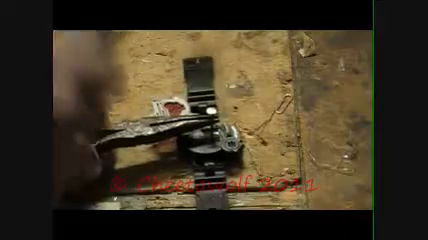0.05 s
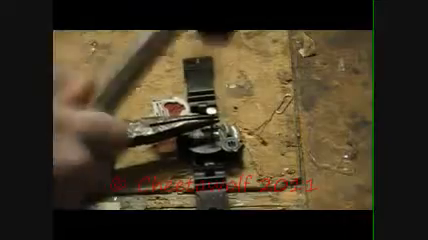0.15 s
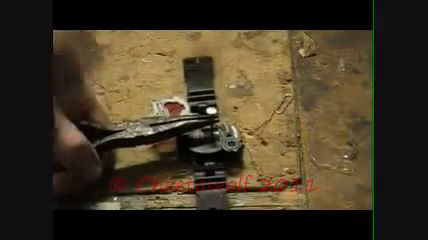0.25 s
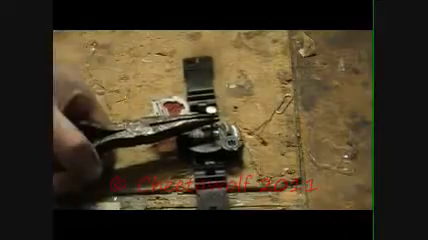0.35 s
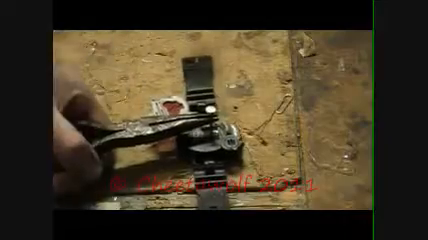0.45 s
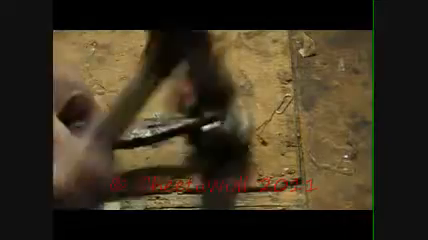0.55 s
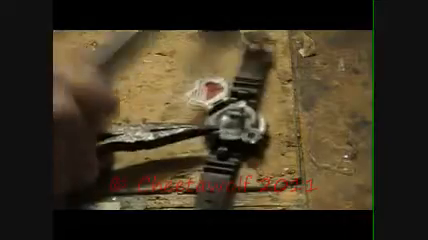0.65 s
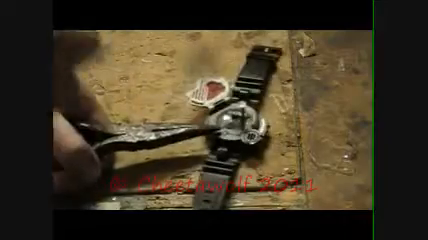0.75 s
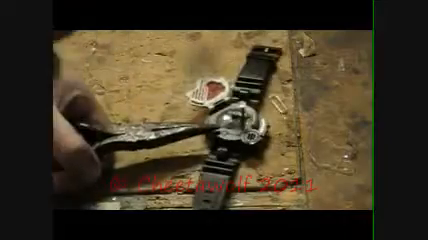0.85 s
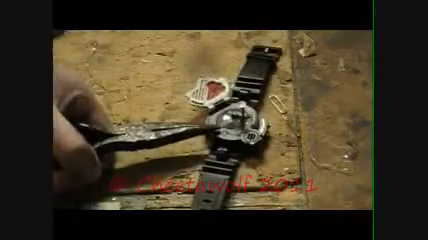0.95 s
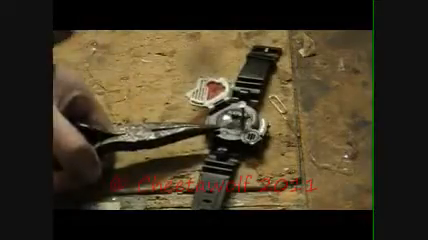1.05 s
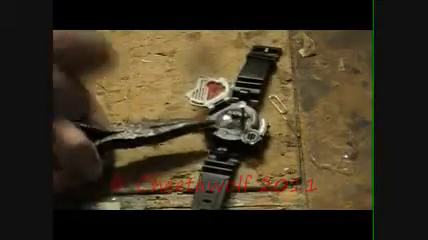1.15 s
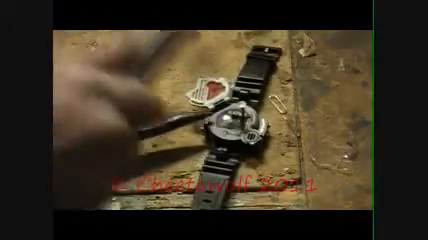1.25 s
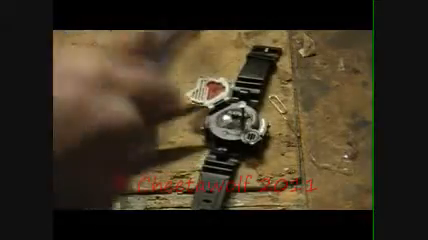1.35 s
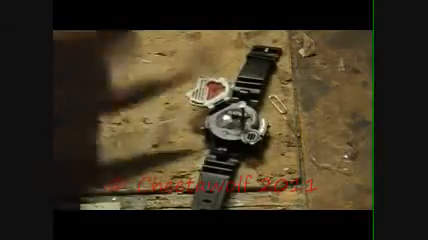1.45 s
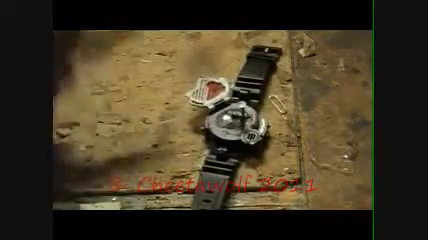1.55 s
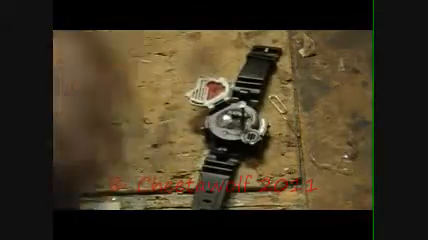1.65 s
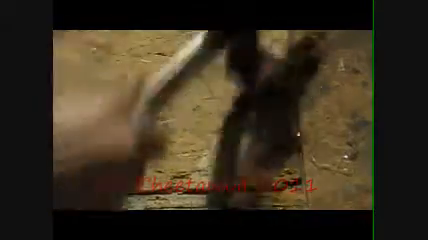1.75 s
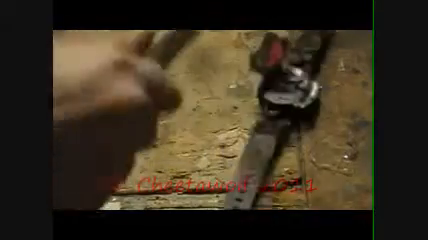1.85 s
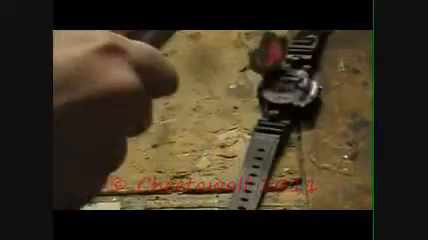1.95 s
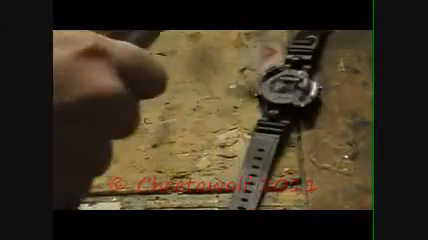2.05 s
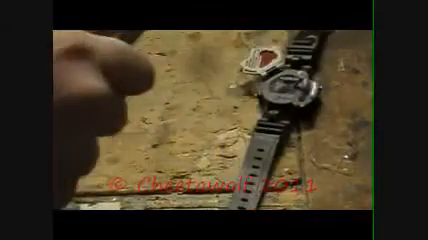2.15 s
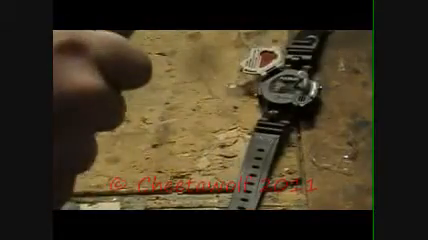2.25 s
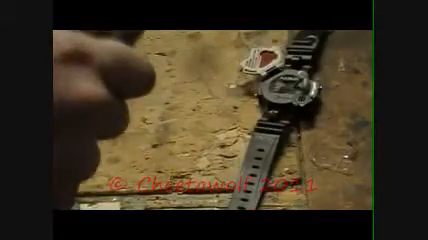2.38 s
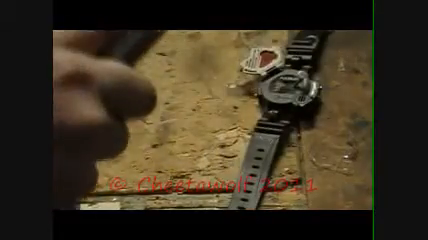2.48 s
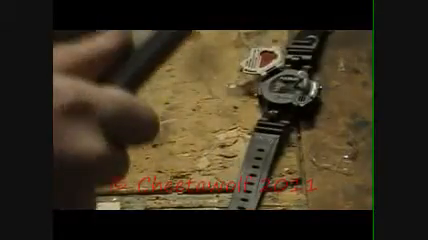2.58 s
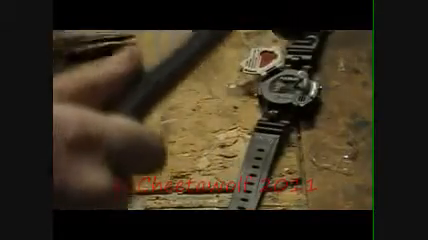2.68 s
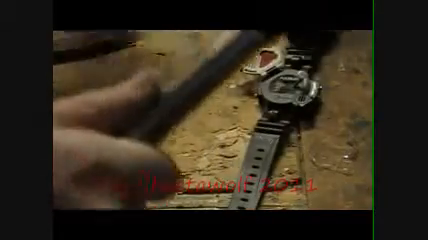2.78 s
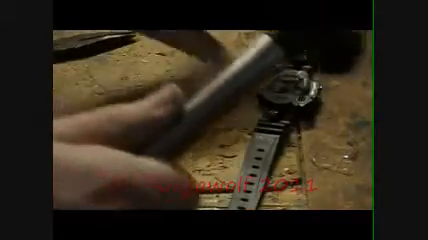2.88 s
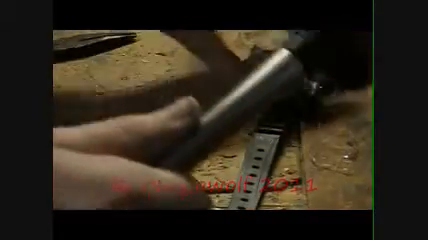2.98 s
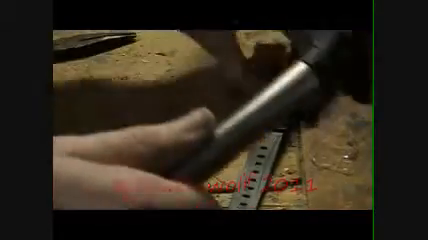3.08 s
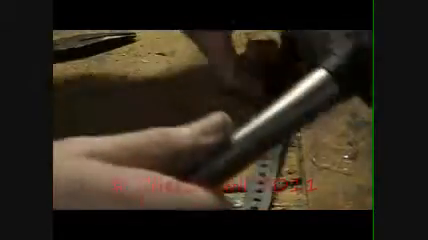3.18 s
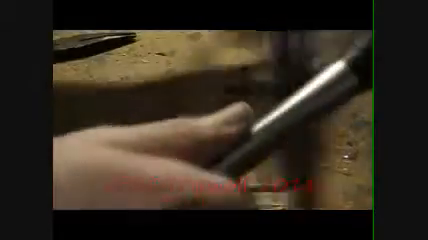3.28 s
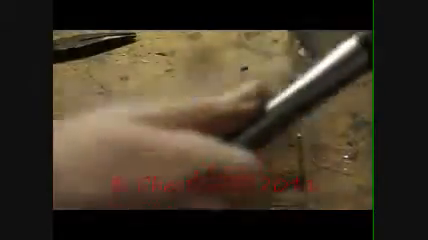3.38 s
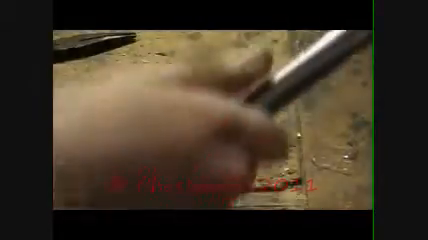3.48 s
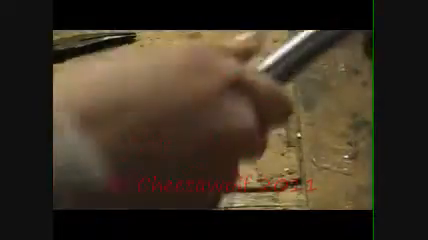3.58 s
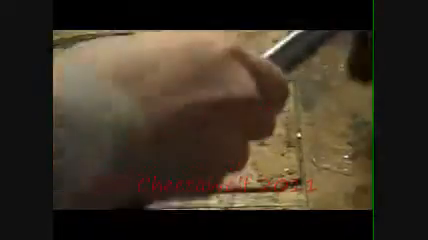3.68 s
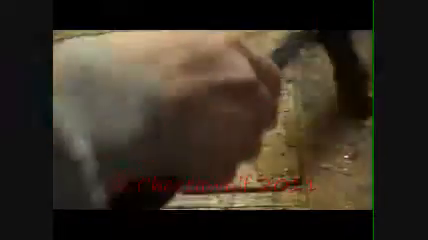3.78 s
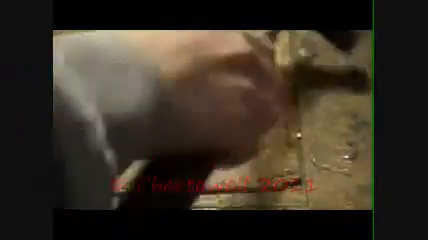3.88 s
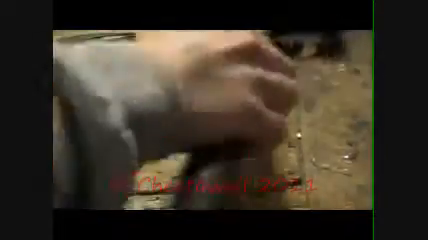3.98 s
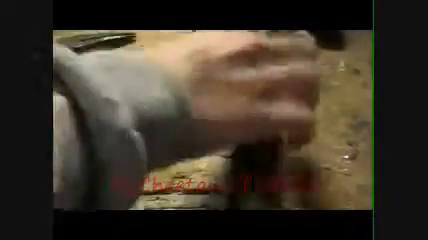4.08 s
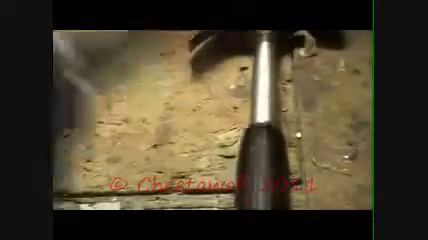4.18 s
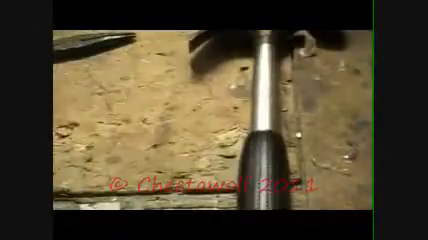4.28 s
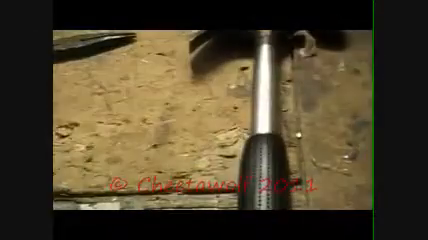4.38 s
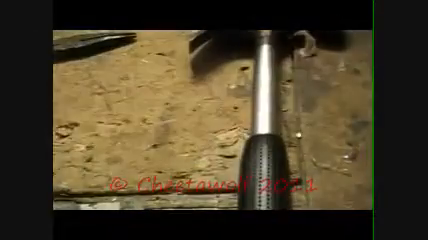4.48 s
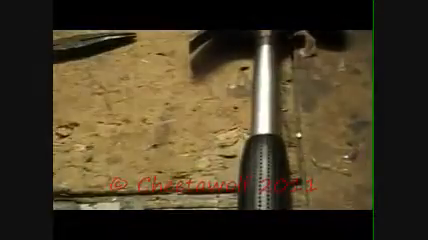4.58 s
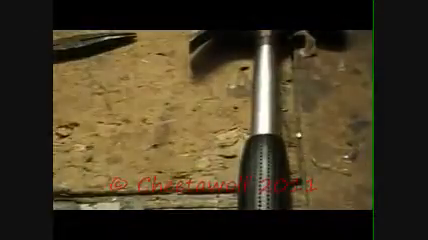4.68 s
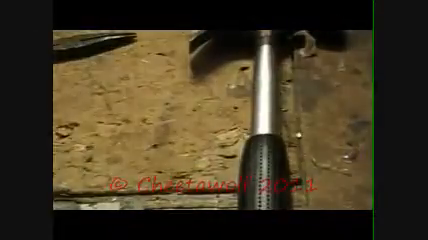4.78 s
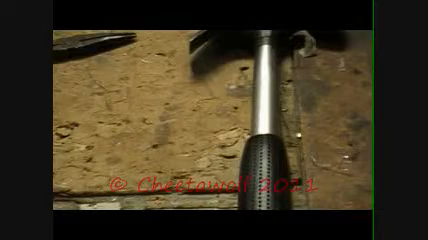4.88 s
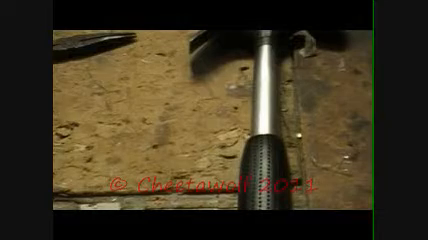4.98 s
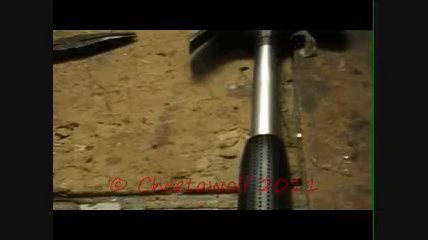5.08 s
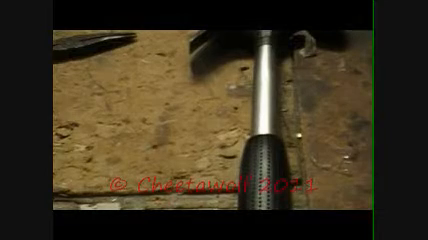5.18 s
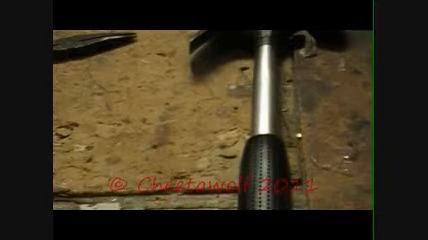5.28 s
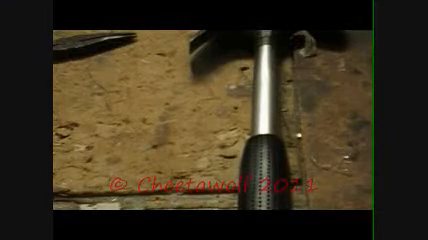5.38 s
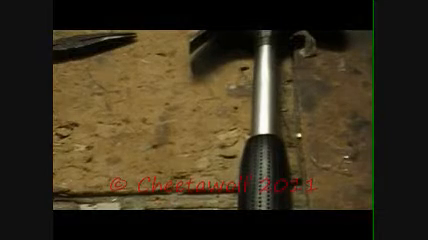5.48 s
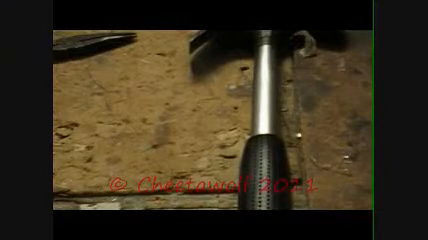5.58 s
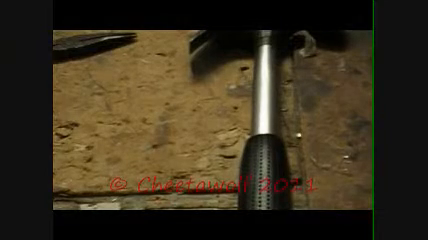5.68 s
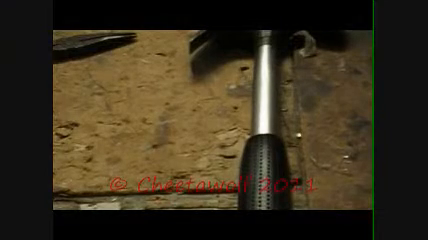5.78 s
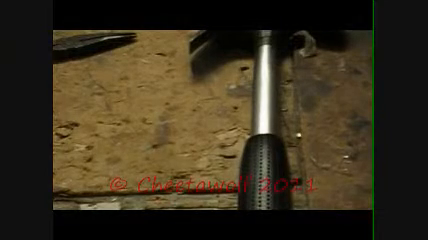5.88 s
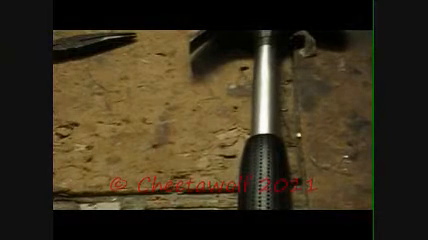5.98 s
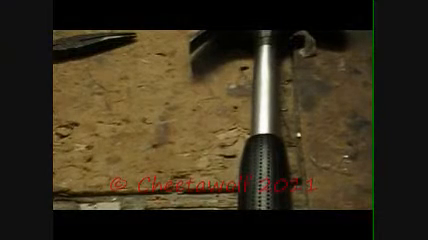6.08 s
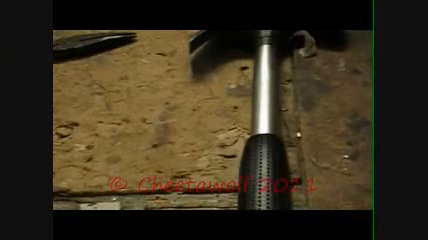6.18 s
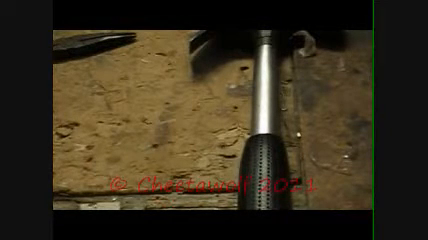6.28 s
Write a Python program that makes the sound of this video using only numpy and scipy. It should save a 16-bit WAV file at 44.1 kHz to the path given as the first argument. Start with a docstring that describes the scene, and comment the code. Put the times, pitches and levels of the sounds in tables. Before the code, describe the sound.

Close to the microphone in a small workshop, a hammer hits a nail set on a plastic piece, with a sharp crack, a tiny high ring and a rattle. A second hard blow follows about a second later, and the plastic bounces on a wooden board. Pliers and hammer are handled with light clicks and knocks, then the hammer lands in a cluster of wooden thuds. Faint hiss and room air remain.

```python
"""A small workshop, close to a camera. A hammer drives a nail into a plastic toy on a wooden board,
the toy jumps and rattles, and pliers and hammer are handled and dropped. Each impact radiates a
broadband click and excites the damped normal modes of board and toy; the steel nail rings briefly.
The walls add a short reverberation. Room air, a faint camera whine and microphone hiss lie beneath."""
import sys
import numpy as np
from scipy import signal
from scipy.fft import rfft, irfft, next_fast_len
from scipy.io import wavfile
from scipy.ndimage import uniform_filter1d

SR = 44100
rng = np.random.default_rng(int(sys.argv[2]) if len(sys.argv) > 2 else 0)


def inscribe(sig):
    """Save sig as 16-bit PCM at rate SR to the path in sys.argv[1].

    A 1-D sig is mono; a 2-D sig holds one channel per row.
    Samples are clipped to [-1, 1] before scaling.
    """
    pcm = np.round(np.clip(np.atleast_2d(sig).T, -1, 1) * 32767)
    wavfile.write(sys.argv[1], SR, pcm.astype(np.int16))


N = 279925

# Hard contacts: t/s, click level/dB, board level/dB, plastic level/dB, chatter T60/s, click dullness/1
IMPACTS = [(0.5304, -26, -44, -36.5, 0.039, 0.2), (0.652, 1.5, -19, -7.5, 0.069, 0.4),
           (0.778, -15.5, -27.5, -25.5, 0.036, 0), (0.8309, -43, -33, -32, 0.027, 0.8),
           (0.8687, -18, -53, -36, 0.035, 0.26), (0.919, -36, -45, -37, 0.023, 0.35),
           (1.8123, 6, -13, -13.5, 0.081, 0.47), (1.8203, -13, -24, -23, 0.018, 0.7),
           (1.9754, -2.5, -31, -25, 0.049, 0.7), (2.0136, -17.5, -25.5, -48, 0.12, 0.7),
           (2.7278, -32.5, -36, -33.5, 0.44, 0.6), (2.7549, -23, -16.5, -10.5, 0.054, 0.6),
           (2.7573, -9.5, -56, -37, 0.05, 0.06), (2.825, -13, -29, -10, 0.032, 0.14),
           (2.8543, -37, -17, -48, 0.057, 0.5), (2.9096, -40, -23, -26.5, 0.036, 0.5),
           (2.953, -39, -25, -38, 0.06, 0.6), (2.957, -24.5, -44, -37, 0.043, 0.54),
           (2.988, -37, -34, -33, 0.028, 0.2), (3.3927, -10.5, -65, -29, 0.049, 0.16),
           (3.7731, -41, -34, -48, 0.075, 0.5), (3.9043, -25, -3, -6, 0.056, 0.4),
           (3.925, -20.5, -14, -28, 0.045, 0.7), (3.9888, -17, -33, -57, 0.06, 0.1),
           (4.131, -0.5, -4, -8.5, 0.026, 0.57), (4.203, -5.5, -27, -11.5, 0.077, 1),
           (4.2193, -1.5, -9, -7, 0.033, 0.55), (4.2592, -36, -2.5, -33, 0.098, 0.8),
           (4.3879, -26, -2.5, -21, 0.18, 0.9), (4.4634, -31, -11.5, -43, 0.05, 0.6),
           (4.5187, -32, -21, -40, 0.28, 0.9)]
# Left-right coherence of nearby sources: f/Hz, coherence/1
NEAR_COHERENCE = [(100, .99), (1000, 0.88), (4000, 0.83), (12000, 0.42)]


def impacts():
    """Impact excitation: a force pulse drives the board's low modes, a sharp snap those of the toy."""
    # Normal modes: f/Hz, relative level/dB, T60/s
    board_modes = [(188, -6, .16), (255, -6, .07), (320, 3, .085), (385, -6, .05), (450, -3, .065),
                   (520, -7, .06), (605, -7, .055), (690, -8, .05)]
    plastic_modes = [(788, -3, 0.063), (897, -3, 0.068), (972, -2.5, 0.017), (1100, 13, 0.015),
                     (1348, -5.5, 0.081), (1509, 8.5, 0.017), (1764, 7.5, 0.022), (2120, -6, 0.039),
                     (2120, -10, 0.045), (2616, -5.5, 0.017), (3150, -5, 0.017)]
    # Spectra of bright and dull clicks: f/Hz, relative density level/dB
    bright_spectrum = [(1180, -24), (2000, 5), (3760, -6.5), (5440, -6), (7020, 2.5), (9050, -1),
                       (12900, -4), (14700, -33), (16300, -80)]
    dull_spectrum = [(1500, -1.5), (2300, -20), (3500, 0), (5000, -7.5), (9000, -6), (13000, -53)]
    contact_s, click_rise_s = 0.00052, 0.00028
    out, t = np.zeros((2, N)), np.arange(SR // 4) / SR
    bright = stereo_noise(bright_spectrum, NEAR_COHERENCE, patchy_db=2.2, grain_db=2.2)
    dull = stereo_noise(dull_spectrum, NEAR_COHERENCE, patchy_db=2.2, grain_db=2.2)
    pulse = t / contact_s * np.exp(-t / contact_s)
    swell = 1 - np.exp(-t / (3.3 * contact_s))  # the board's motion builds up under a soft contact
    for start, click_db, board_db, plastic_db, t60, dullness in IMPACTS:
        fade = decay(t, t60)
        chatter = (decay(t, 0.0037) + 0.14 * fade) * rng.standard_normal(len(t))
        blow = pulse + 0.015 * signal.fftconvolve(chatter, pulse)[:len(t)]
        snap = np.append(6, chatter[1:])  # one sharp first touch, then the chatter
        thud = amp(board_db) * swell * modal_response(board_modes, blow, t)
        knock = amp(plastic_db) * modal_response(plastic_modes, snap, t)
        noise = ((1 - dullness) * bright + dullness * dull)[:, round(start * SR):][:, :len(t)]
        attack = 1 - np.exp(-t / click_rise_s)
        click = attack * (fade + 1.64 * decay(t, 0.007)) * noise
        add(out, start, thud + knock + amp(click_db) * click / np.abs(click).max())
    return out


def modal_response(modes, force, t):
    """Modal superposition: damped sines of scattered level, sign and pitch, convolved with the force."""
    impulse_response = np.zeros(len(t))
    for hz, db, t60 in modes:
        strength = amp(db + rng.normal(0, 5)) * rng.choice([-1, 1])
        detuned_hz = hz * rng.normal(1, 0.018)
        impulse_response += strength * decay(t, t60) * np.sin(2 * np.pi * detuned_hz * t)
    sound = signal.fftconvolve(impulse_response, force)[:len(t)]
    return sound / np.sqrt(np.max(uniform_filter1d(sound ** 2, size=200)))  # peak short-time rms of 1


def rattle():
    """Dense small collisions and sliding friction merge into structure-borne and airborne noise."""
    # Parts settling after a heavy contact: t/s, board level/dB, airborne level/dB, T60/s
    clatters = [(.652, -16, -22, 0.43), (1.812, -16, -19.5, 0.57), (2.755, -10, -44, 0.12),
                (2.825, -8.5, -32, 0.1), (2.909, -21, -49, 0.097), (3.904, -7.5, -26, 0.16),
                (4.131, -12.5, -23, 0.21), (4.203, -11.5, -19.5, 0.3), (4.219, -33, -34, 0.064),
                (4.259, -15, -29.5, 0.24), (4.389, -28, -39.5, 0.61)]
    # Parts scraping over the board: t/s, duration/s, board level/dB, airborne level/dB
    slides = [(0.525, 0.015, -43, -39), (0.619, 0.1, -52, -40.5), (0.67, .13, -45, -41.5),
              (1.068, 0.01, -40, -71), (2.008, 0.032, -50, -78), (2.24, 0.14, -48.5, -72),
              (2.358, 0.32, -58.5, -51.5), (3.134, 0.098, -48.5, -49), (3.34, .08, -62, -51.5),
              (4.115, .02, -51, -29.5), (5.725, 0.021, -43.5, -46.5)]
    # Spectra of the two paths: f/Hz, relative density level/dB
    board_spectrum = [(76, -41), (130, -3.5), (176, -5), (248, -8), (346, -2.5), (414, -11), (449, -6),
                      (530, -5.5), (3500, -28.5), (4550, -33), (7700, -120)]
    airborne_spectrum = [(1760, 3), (3000, -2), (5690, -8.5), (6600, -8), (7700, -7), (9620, -8),
                         (13100, -22), (15000, -50)]
    slide_rise_s, slide_t60_s = 0.0072, 0.31
    envelopes, t = np.zeros((2, N)), np.arange(SR // 2) / SR
    for start, board_db, airborne_db, t60 in clatters:
        nearest_impact = min((row[0] for row in IMPACTS), key=lambda time: abs(time - start))
        add(envelopes, nearest_impact, amp([[board_db], [airborne_db]]) * decay(t, t60))
    for start, duration, board_db, airborne_db in slides:
        stroke = np.clip(t / slide_rise_s, 0, 1) * decay(np.maximum(t - duration, 0), slide_t60_s)
        add(envelopes, start, amp([[board_db], [airborne_db]]) * stroke)
    board = stereo_noise(board_spectrum, NEAR_COHERENCE, patchy_db=2.2, grain_db=1.5)
    airborne = stereo_noise(airborne_spectrum, NEAR_COHERENCE, patchy_db=2, grain_db=1.8)
    return envelopes[0] * board + envelopes[1] * airborne


def ticks():
    """Resonant filtering: each light touch is a tiny crack coloured by a broad and a narrow resonance."""
    # Touches of steel and plastic: t/s, level/dB, f/Hz, share of narrow resonance/1
    touches = [(0.3496, -37, 8700, 0.7), (0.717, -16.5, 6900, 0.5), (0.8187, -13, 2760, 0.44),
               (1.0094, -32.5, 9700, 1), (1.048, -39, 9200, 0.8), (1.917, -20, 10000, 0.4),
               (1.9324, -26, 10300, 0.5), (1.944, -23, 11000, .4), (1.9555, -16.5, 10500, .8),
               (2.0420, -18.5, 4700, 0), (2.1177, -29.5, 7200, 0), (2.2037, -21.5, 9050, 0.1),
               (2.2557, -41, 4600, .4), (2.2634, -31, 4420, 0), (2.2907, -34.5, 8200, 0.25),
               (2.4512, -36.5, 3900, .4), (2.487, -38, 9300, .5), (2.5564, -34, 3750, 0.1),
               (2.6333, -35, 3080, 0.15), (2.7586, -4, 9800, 0.5), (3.1273, -39, 7900, .3),
               (3.146, -35, 4540, 0.5), (3.1574, -29, 8820, 0.4), (3.175, -25, 8800, 0.5),
               (3.181, -21.5, 8400, 0), (3.242, -29, 3320, 0), (3.267, -29.5, 8300, 0.3),
               (3.325, -33, 3300, 0.3), (3.3432, -22, 8450, 0.1), (3.4184, -33, 11000, .4),
               (3.4405, -26, 4630, 0.07), (3.5093, -40, 3750, 0.3), (3.5702, -20.5, 8750, 0.1),
               (3.619, -18.5, 9740, 1), (3.9764, -16, 8800, 1), (4.0517, -30, 9000, 1),
               (4.1002, -29, 8800, 0.7), (4.805, -38.5, 3490, 0), (5.1305, -33, 8240, 0.1),
               (5.285, -39, 2100, 0.7), (5.994, -26.5, 8100, 0.02), (6.2117, -22.5, 2230, 1)]
    broad_q, narrow_q, cutoff_hz = 1.3, 7, 12800
    out, t = np.zeros((2, N)), np.arange(SR // 10) / SR
    envelope = 0.37 * decay(t, 0.019) + 0.33 * decay(t, 0.0012)
    for start, db, hz, ringing in touches:
        crack = envelope * rng.standard_normal(len(t))
        broad = signal.lfilter(*signal.iirpeak(hz, broad_q, SR), crack)
        narrow = signal.lfilter(*signal.iirpeak(hz, narrow_q, SR), crack)
        tick = (1 - ringing) * broad + 8.1 * ringing * narrow
        channel_gains = amp(db + rng.normal(0, 1.0, size=(2, 1)))
        add(out, start, channel_gains * tick / np.abs(tick).max())
    return filtered(out, lambda hz: 1 / (1 + (hz / cutoff_hz) ** 16))


def nail():
    """Damped free vibration: the steel nail rings after the blow and as it springs loose."""
    # Tones of the nail: t/s, f/Hz, level/dB, T60/s
    tones = [(.652, 9300, -11, .1), (.825, 10130, -49, .6)]
    out, t = np.zeros(N), np.arange(SR // 4) / SR
    fade_out = np.clip((t[-1] - t) / 0.075, 0, 1)
    for start, hz, db, t60 in tones:
        add(out, start, amp(db) * decay(t, t60) * np.sin(2 * np.pi * hz * t) * fade_out)
    return out


def reverberation(direct):
    """Diffuse reflection: treble dies fastest; the response is drawn anew as for a moving source."""
    # Reverberation time of the room: f/Hz, T60/s
    decay_times = [(150, 0.59), (1000, 0.25), (5000, 0.16), (12000, 0.095)]
    # Left-right coherence of the reflections: f/Hz, coherence/1
    coherence = [(150, 0.9), (500, 0.92), (2000, 0.8), (10000, 0.16)]
    out, block, delay_s = np.zeros((2, N)), SR // 6, 0.004
    for first in range(0, N, block):
        hz, t, noise = signal.stft(rng.standard_normal((2, SR // 3)), SR, nperseg=256)
        hz = hz[:, None]
        bass_loss = hz / (hz + 700)  # light walls let the bass out
        mid, side = bass_loss * noise * mid_side_gains(coherence, hz)
        bands = np.array([mid + side, mid - side]) * decay(t, at_frequency(decay_times, hz))
        tail = signal.istft(bands, SR, nperseg=256)[1]
        tail /= np.linalg.norm(tail[0])
        add(out, first / SR + delay_s, signal.fftconvolve(direct[:, first:first + block], tail, axes=1))
    return out


def room_air_and_hiss():
    """Background noise: distant room rumble and microphone hiss add as independent random signals."""
    # Course of the background: t/s, room level/dB, hiss level/dB
    levels = [(0, -44.5, -54), (.25, -51, -54.5), (1.2, -51, -54.5), (1.7, -49, -52), (2.6, -50, -56),
              (3.7, -49.5, -52), (4.8, -52, -55), (5.15, -48.5, -51), (5.6, -50, -54), (5.8, -49.5, -52),
              (6.35, -44, -50)]
    # Noise spectra: f/Hz, relative density level/dB
    room_spectrum = [(15, -38), (25, -29), (40, -14), (86, -17.5), (108, 0.5), (139, -12.5), (165, -2),
                     (344, -6.5), (525, -0.5), (624, -5), (662, -4.5), (1320, -6.5), (2500, -21.5),
                     (3250, -45), (5500, -120)]
    hiss_spectrum = [(1060, -31), (1800, -2.5), (2610, -7.5), (2840, -6), (3140, -8), (3560, -8.5),
                     (4040, -9), (5620, -11), (10800, -9), (12300, -22), (13500, -57), (14500, -90)]
    # Left-right coherence of both noises: f/Hz, coherence/1
    coherence = [(60, 0.59), (150, 1), (380, 0.13), (950, 0.15), (2380, 0.23), (5980, 0.45), (15000, 0.053)]
    room_gain, hiss_gain = gain_curves(levels)
    hiss = stereo_noise(hiss_spectrum, coherence, patchy_db=0.55)
    room = stereo_noise(room_spectrum, coherence, patchy_db=2.0)
    return room_gain * room + hiss_gain * hiss


def camera_whine():
    """Amplitude modulation: the thin tone of the camera's drive pulses once a turn, slightly unevenly."""
    # Course of the whine: t/s, level/dB
    levels = [(0, -75), (.8, -72), (1.0, -68.5), (1.8, -67), (2.1, -74), (4.3, -72), (4.6, -67.5),
              (5.0, -69), (5.2, -75), (6.35, -75)]
    carrier_hz, turns_per_s, offset_s = 2892, 29.97, 0.0082
    t = np.arange(N) / SR
    turns = turns_per_s * (t - offset_s) + 1
    strengths = amp(1.5 * rng.standard_normal(int(turns[-1]) + 1))
    pulses = strengths[turns.astype(int)] * np.sin(np.pi * turns) ** 2
    return gain_curves(levels)[0] * unit_rms(pulses * np.sin(2 * np.pi * carrier_hz * t))


def stereo_noise(spectrum, coherence, patchy_db, grain_db=0):
    """Spectral shaping: noise of rms 1 with millisecond grains and random time-frequency patches."""
    grain_sizes = np.minimum(rng.exponential(size=N // 40 + 1), 3)
    grains = amp(grain_db * np.repeat(grain_sizes, 40)[:N])
    bands = signal.stft(grains * rng.standard_normal((2, N)), nperseg=512)[2]
    patches = uniform_filter1d(rng.standard_normal(bands.shape[1:]), size=6, axis=0)
    patches = unit_rms(uniform_filter1d(patches, size=10, axis=1))
    pair = signal.istft(bands * amp(patchy_db * patches), nperseg=512)[1][:, :N]
    mid, side = filtered(pair, lambda hz: amp(at_frequency(spectrum, hz)) * mid_side_gains(coherence, hz))
    return unit_rms(np.array([mid + side, mid - side]))


def mid_side_gains(coherence, hz):
    """Left-right coherence equals mid power minus side power when the two sum to 1."""
    angle = np.arccos(np.clip(at_frequency(coherence, hz), -1, 1)) / 2
    return np.array([np.cos(angle), np.sin(angle)])


def amp(db):
    """Amplitude ratio of a level in decibels."""
    return 10 ** (np.asarray(db) / 20)


def decay(t, t60):
    """Exponential damping by 60 dB in t60 seconds."""
    return amp(-60 * t / t60)


def unit_rms(x):
    """Normalisation to rms 1."""
    return x / np.sqrt(np.mean(x ** 2) + 1e-20)


def at_frequency(points, hz):
    """Interpolation of (f/Hz, value) points on a logarithmic frequency axis."""
    frequencies, values = np.transpose(points)
    return np.interp(np.log(hz + 1), np.log(frequencies + 1), values)


def gain_curves(rows):
    """Interpolation of (t/s, level/dB, ...) rows to one gain per sample for each level column."""
    times, *levels = np.transpose(rows)
    return amp([np.interp(np.arange(N) / SR, times, db, -120, -120) for db in levels])


def filtered(x, response):
    """Linear filtering: the spectrum of x times a frequency response."""
    size = next_fast_len(N + SR // 2)
    return irfft(rfft(x, size) * response(np.fft.rfftfreq(size, 1 / SR)), size)[..., :N]


def add(track, start_s, sound):
    """Superposition of a sound on the track from start_s."""
    part = track[..., round(start_s * SR):][..., :sound.shape[-1]]
    part += sound[..., :part.shape[-1]]


def scene():
    """Superposition of direct sound, reflections and background."""
    direct = impacts() + ticks() + nail()
    contacts = direct + amp(-9.0) * reverberation(direct) + rattle()
    # The board radiates little deep bass; a low-pass softens the top treble of the contacts.
    contacts = filtered(contacts, lambda hz: (1j * hz / (140 + 1j * hz)) ** 4 / (1 + (hz / 12500) ** 12))
    return contacts + room_air_and_hiss() + camera_whine()


def record(dry):
    """Saturation rounds the peaks near full scale; a low-pass limits the bandwidth."""
    ceiling, top_hz = 1.03, 16400
    clipped = dry / (1 + np.abs(dry / ceiling) ** 8) ** (1 / 8)
    return filtered(clipped, lambda hz: np.clip((top_hz - hz) / 500, 0, 1))


dry = scene()
out = record(dry)
inscribe(out)
```